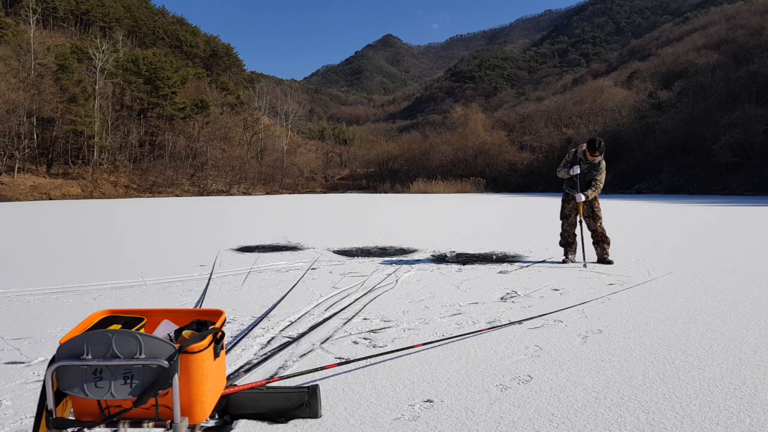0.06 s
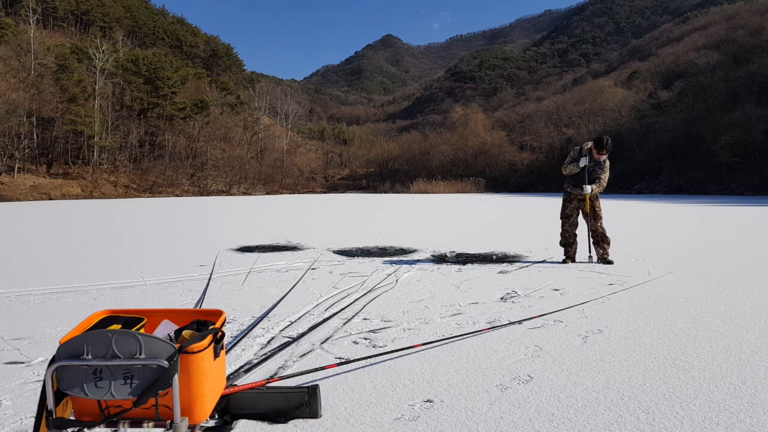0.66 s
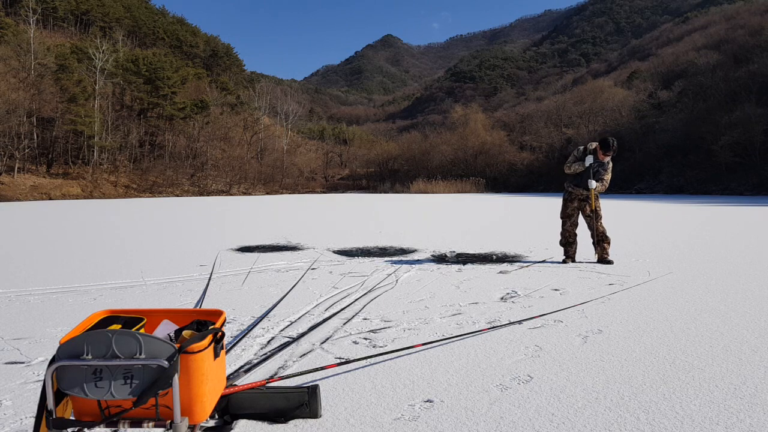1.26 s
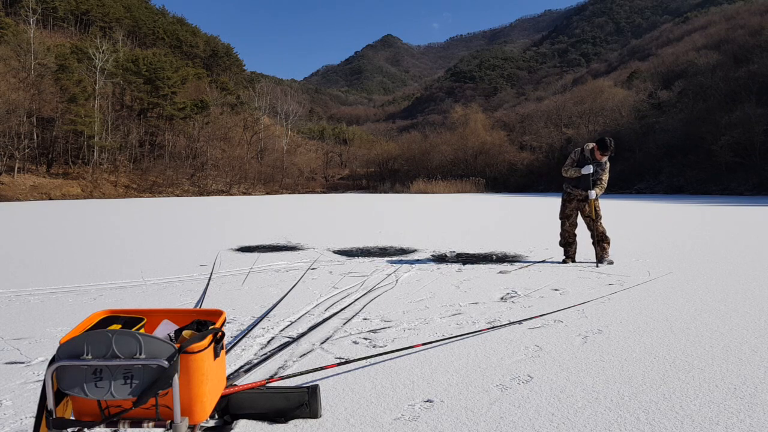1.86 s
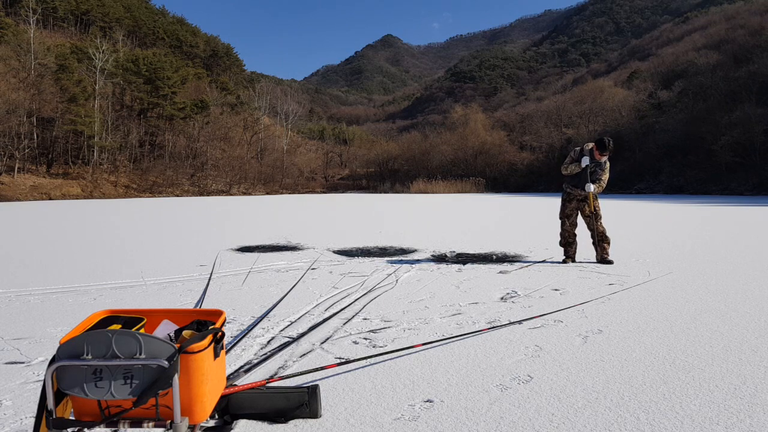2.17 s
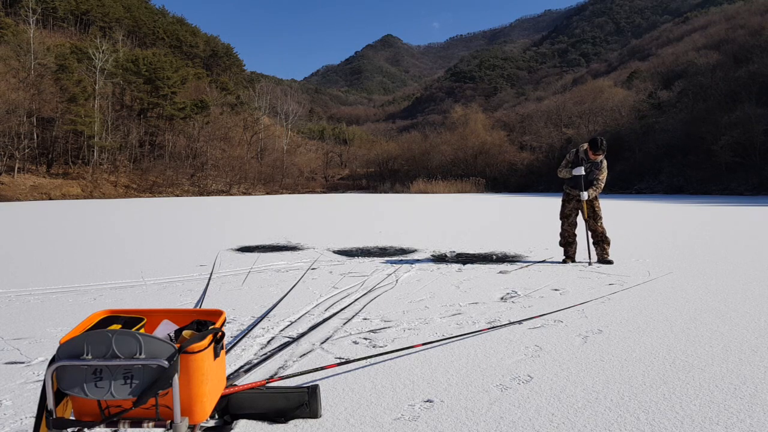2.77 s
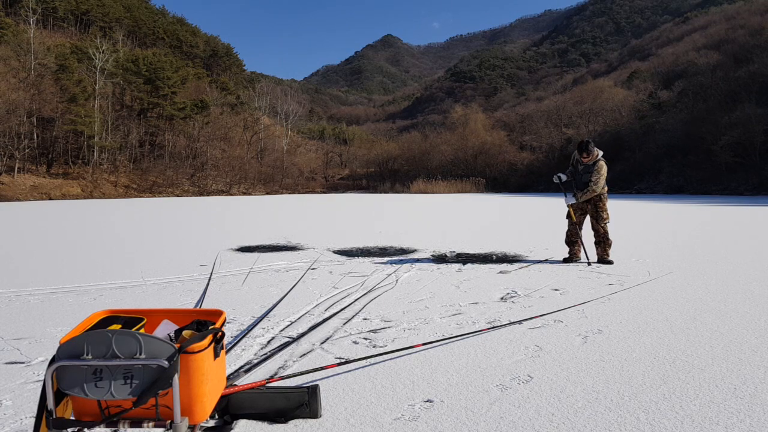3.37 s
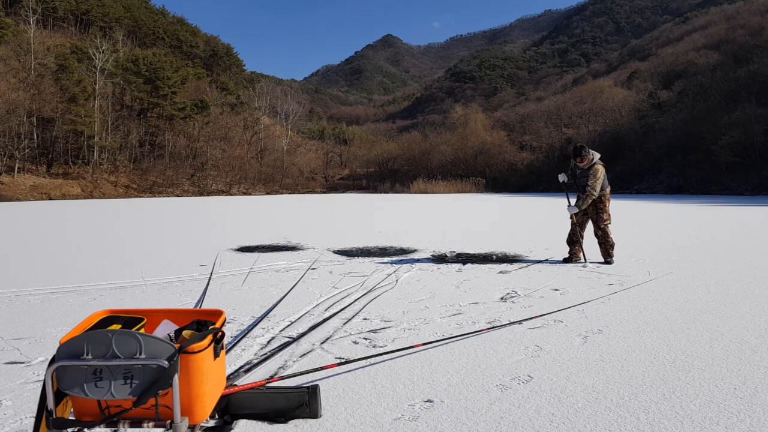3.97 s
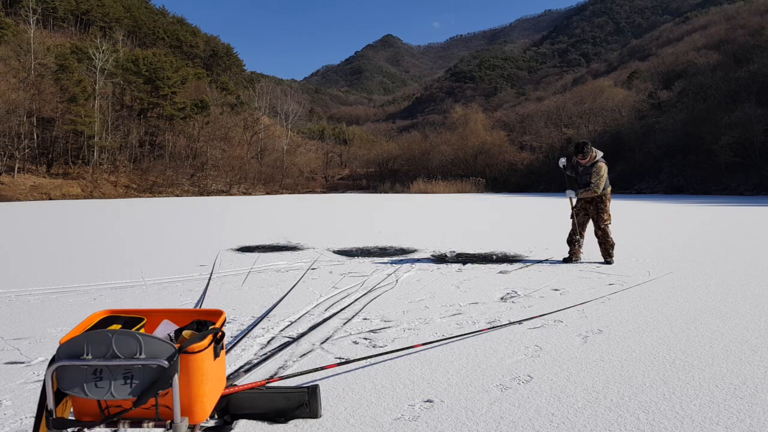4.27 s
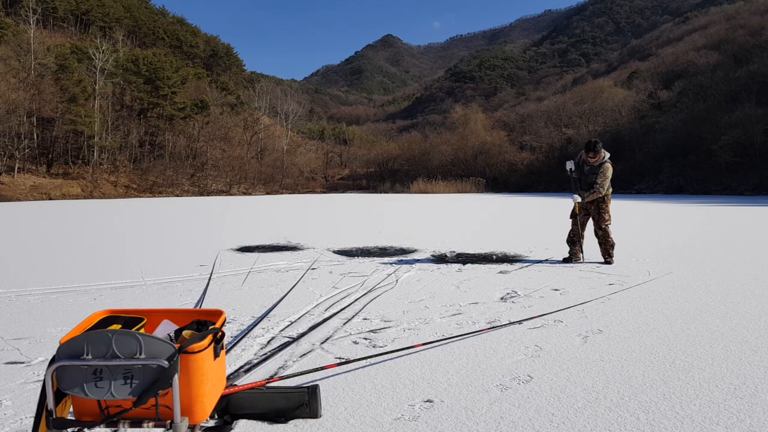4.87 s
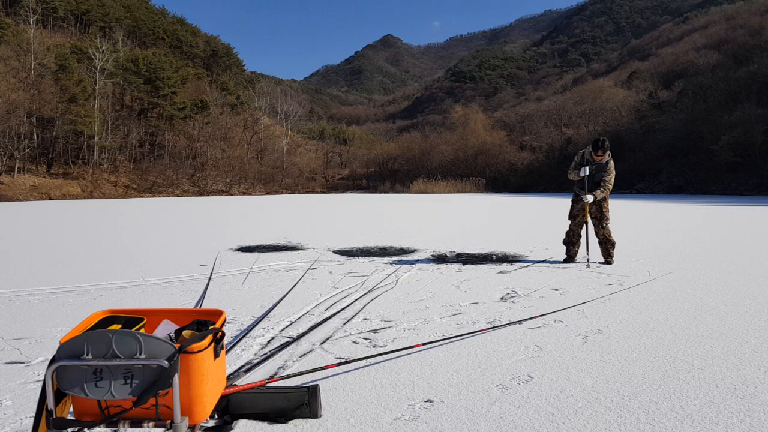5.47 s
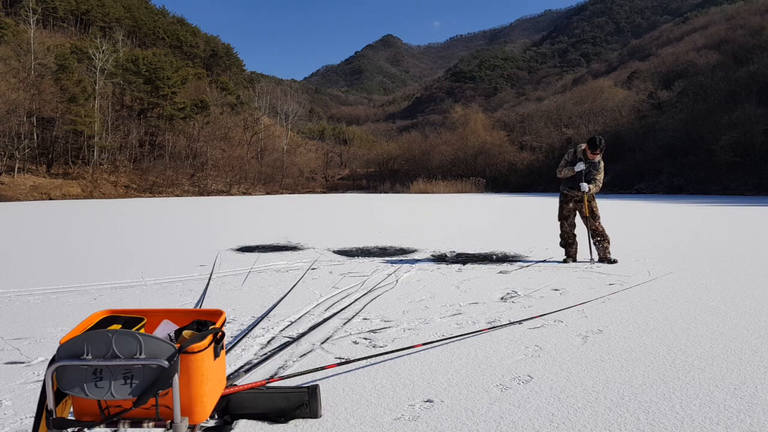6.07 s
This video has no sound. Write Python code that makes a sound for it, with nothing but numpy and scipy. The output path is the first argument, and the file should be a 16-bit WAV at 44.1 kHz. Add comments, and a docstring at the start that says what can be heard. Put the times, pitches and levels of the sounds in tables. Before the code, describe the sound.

A steel chisel chops into a frozen lake in steady ringing, crunching blows with low thumps, pausing once, over faint wind.

```python
"""Light wind and a faint hiss lie over a frozen reservoir. Almost at once a steel ice chisel, some ten
metres away, starts chopping a hole. Each blow bends the ice sheet, and the fast, high waves arrive first,
as a falling chirp and a short note. The ice crunches, the steel bar rings and the slow waves add a low
thump. Then the loose blade knocks and scrapes in the hole while the note returns from the shores as a
soft hum. After seven blows comes a short pause, then five more."""
import sys
import numpy as np
from scipy import signal
from scipy.fft import rfft, irfft, next_fast_len
from scipy.io import wavfile

SR = 44100
rng = np.random.default_rng(int(sys.argv[2]) if len(sys.argv) > 2 else 0)


def bounce(signal):
    """Save signal as a 16-bit WAV file at the path given by the first command-line argument."""
    frames = np.transpose(np.atleast_2d(signal))
    limited = np.clip(frames, -1, 1)
    pcm = np.round(limited * 32767).astype(np.int16)
    wavfile.write(sys.argv[1], SR, pcm)


N = 270333
TIME = np.arange(N) / SR


def from_db(db):
    """Turn decibels into a number to multiply by."""
    return 10 ** (np.asarray(db) / 20)


def rms_one(x):
    """Scale a sound so that its average strength (rms) is 1."""
    return x / np.sqrt(np.mean(x ** 2) + 1e-20)


def at_hz(points, hz):
    """Read between the rows of a frequency table, giving each octave equal room."""
    known_hz, values = np.transpose(points)
    return np.interp(np.log(np.maximum(hz, 1)), np.log(known_hz), values)


def add(track, s, sound):
    """Mix a sound into the track, starting at s seconds."""
    start = max(round(s * SR), 0)
    track[start:start + len(sound)] += sound[:max(N - start, 0)]


def colour(x, spectrum, size=4096):
    """Give a sound the tone in a table; white noise keeps its power."""
    gain = from_db(at_hz(spectrum, np.fft.rfftfreq(size, 1 / SR)))
    cepstrum = irfft(np.log(rms_one(gain)))
    # fold the filter so that it never answers before the sound starts
    cepstrum[1:size // 2] *= 2
    cepstrum[size // 2 + 1:] = 0
    response = irfft(np.exp(rfft(cepstrum)))
    return signal.oaconvolve(x, response)[:len(x)]


def band(x, low_hz, high_hz):
    """Soften everything outside two frequencies."""
    return signal.sosfilt(signal.butter(2, [low_hz, high_hz], "band", fs=SR, output="sos"), x)


def ring(force, hz, t60):
    """Each push starts a pure tone, which fades by 60 dB in t60 seconds."""
    decay, step = from_db(-60 / (t60 * SR)), 2 * np.pi * hz / SR
    feedback = [1, -2 * decay * np.cos(step), decay ** 2]
    return signal.lfilter([.5, 0, -.5], feedback, force + 1e-18)


def glide_phase(pitch_hz, centre):
    """The angle of a wave with sliding pitch, counted from sample number `centre`."""
    phase = 2 * np.pi * np.cumsum(pitch_hz) / SR
    return phase - phase[min(round(centre), len(phase) - 1)]


def fracture(length, rise, fade, grain_db, size=8192):
    """Ice breaks in many tiny, uneven cracks for `length` seconds; then they die away."""
    t = TIME[:size]
    envelope = np.minimum(t / rise, 1) * np.exp(-np.maximum(t - length, 0) / fade)
    noise = rng.standard_normal(size)
    crack_sizes = from_db(grain_db * np.clip(rng.standard_normal(size // 16), -2, 2)).repeat(16)
    return rms_one(noise * crack_sizes * envelope) * np.sqrt(np.mean(envelope ** 2))


# The deep tone of the wind: f/Hz, level/dB
WIND_TONE = [(12, -37), (20, -8.5), (61, -7), (101, -15), (118, -10.5), (162, -28.5), (241, -31),
             (439, -39.5), (600, -33.5), (780, -82.5), (1320, -120)]


def wind(level_db=-67.5, gust_db=5.0, count=50):
    """Light air rumbles, swelling and sinking at random."""
    gusts = np.interp(TIME, np.linspace(0, TIME[-1], count), rng.standard_normal(count))
    return from_db(level_db + gust_db * gusts) * rms_one(colour(rng.standard_normal(N), WIND_TONE))


# The tone of the hiss: f/Hz, level/dB
HISS_TONE = [(290, -52.5), (500, -12), (769, -2), (954, -9), (1180, -5.5), (1670, -9), (1900, -8.5),
             (4770, -7.5), (5590, -4.5), (7780, -3.5), (15500, -8.5)]
# How alike its left and right sides are: f/Hz, likeness (1 = the same)
HISS_ALIKE = [(500, 0.83), (2000, 0.51), (5000, 0.11), (9000, 0.21), (14000, .05)]


def hiss(level_db=-76):
    """Steady microphone hiss; its high part spreads wider between left and right."""
    size = next_fast_len(N, real=True)
    hz = np.fft.rfftfreq(size, 1 / SR)
    alike = np.clip(at_hz(HISS_ALIKE, hz), 0, 1)
    mid, side = rfft(rng.standard_normal((2, size))) * from_db(at_hz(HISS_TONE, hz))
    both = np.sqrt(1 + alike) * mid + np.sqrt(1 - alike) * side * np.array([[1], [-1]])
    return from_db(level_db) * rms_one(irfft(both, size)[:, :N])


# The chisel blows; each function adds its own offset to these levels: t/s, crushing time/s, crunch/dB,
# treble boost/dB, ring of the stuck bar/Hz, ice note delay/s, ice note f/Hz, ice note/dB, thump/dB
CHOPS = [(0.158, 0.014, -41, 7, 4074, .007, 457, -45.5, -38),
         (0.622, 0.011, -39.5, 5.5, 1880, .014, 376, -38, -35.5),
         (1.054, 0.0077, -39, 2.5, 2820, 0.011, 396, -35, -38),
         (1.512, 0.014, -42, -3.5, 1437, 0.0062, 398, -33.5, -30),
         (1.939, .0055, -38, 3.5, 2385, 0.0027, 422.6, -45.5, -39),
         (2.393, 0.0078, -41.5, 8, 4390, 0.0099, 414, -41, -34.5),
         (2.836, 0.013, -38.5, 0, 2134, 0.0066, 390.4, -39.5, -34.5),
         (4.125, 0.01, -35, -19, 1338, .010, 404.4, -35, -37),
         (4.618, 0.013, -42, -1.5, 1870, 0.00998, 436.3, -41.5, -36),
         (5.083, 0.017, -39.5, 1.5, 4000, 0.0095, 420.8, -23, -30),
         (5.538, 0.016, -41.5, -12, 940, .007, 426, -36.5, -36.5),
         (6.013, 0.024, -38.5, -0.5, 1795, 0.014, 466.5, -35, -33)]
# The tone of the earliest waves, dulled by the ice: f/Hz, level/dB
FORERUNNER_TONE = [(200, -8), (400, 14), (650, 9.5), (1000, -0.5), (1500, -3), (2600, -14.5), (4700, -18.5),
                   (6500, -22.5), (10000, -34), (16000, -48)]


def forerunners(lead_s=.016, level_db=-6):
    """Short waves in the ice outrun sound in air and arrive just before each crunch."""
    force = np.zeros(N)
    for s, _, db, *_ in CHOPS:
        cracks = fracture(lead_s, rise=0.0059, fade=0.001, grain_db=2.0)
        add(force, s - lead_s, from_db(db + level_db) * cracks)
    return colour(force, FORERUNNER_TONE)


# How loud the chirp is at each pitch on its way down: f/Hz, level/dB
CHIRP_TONE = [(70, -36), (120, -12), (195, -22), (290, -12.5), (400, -5.5), (600, 9.5), (800, 3),
              (1300, -8), (3000, -42.5)]


def chirps(travel_s=0.023, level_db=-9, size=4096):
    """A wave four times as high crosses the ice twice as fast, so each blow becomes a falling chirp."""
    out, flight = np.zeros(N), TIME[1:size]
    fade = signal.windows.tukey(len(flight), .2)
    for s, *_, lag, hz, db, _ in CHOPS:
        pitch = np.minimum(hz * (travel_s / flight) ** 2, SR / 4)
        chirp = fade * from_db(at_hz(CHIRP_TONE, pitch)) * np.sin(glide_phase(pitch, travel_s * SR))
        add(out, s + lag - travel_s, from_db(db + level_db) * chirp)
    return out


# The tone with which the ice answers every touch: f/Hz, level/dB
ICE_TONE = [(190, -26), (280, -9), (345, -9.5), (405, -5), (470, -11.5), (540, -11.5), (640, -22.5),
            (1200, -31), (4000, -68)]


def ice_note(width_s=0.0048, glide_s=0.071, lead_s=.023, late_fade_s=0.04,
             early_db=-22, rough_db=-17, late_db=-19, level_db=10.0, size=8192):
    """Waves as fast as sound pass best into the air: a brief sinking note, rough with scattered waves."""
    out, age = np.zeros(N), TIME[:size]
    t = age - lead_s  # zero at the peak of the note
    swell = np.exp(-np.abs(t / width_s) ** 3 / 2)
    early = from_db(early_db) * np.sin(np.pi * np.minimum(age / lead_s, 1)) ** 2
    late = from_db(late_db) * np.clip(t / width_s, 0, 1) * np.exp(-np.abs(t) / late_fade_s)
    for s, *_, lag, hz, db, _ in CHOPS:
        pitch = hz * np.exp(-np.clip(t, -2 * width_s, 2 * width_s) / glide_s)
        note = (swell + early) * np.sin(glide_phase(pitch, lead_s * SR))
        noise = rms_one(colour(rng.standard_normal(size), ICE_TONE))
        scattered = (from_db(rough_db) * swell + late) * noise
        add(out, s + lag - lead_s, from_db(db + level_db) * (note + scattered))
    return out


# The tone of breaking ice: f/Hz, level/dB
CRUNCH_TONE = [(200, -2.5), (500, 15), (720, 2.5), (1100, 2.5), (1500, 0.5), (2700, 0.5), (4700, -3),
               (6000, -16), (7700, -13.5), (10000, -22), (12500, -44.5), (16000, -48.5)]


def crunches(level_db=2, crumbs_db=-24, bar_db=-45, stuck_db=-30, bright_hz=5500):
    """The edge crushes ice, crumbs fly after it, and the bar rings."""
    force, stuck = np.zeros((2, N))
    treble = signal.butter(1, bright_hz, "high", fs=SR)
    for s, length, db, bright_db, ring_hz, *_ in CHOPS:
        crush = fracture(length * 0.98, rise=0.0025, fade=0.0059, grain_db=3.5)
        crumbs = from_db(crumbs_db) * fracture(length, rise=0.014, fade=0.044, grain_db=5.5)
        bite = from_db(db + level_db) * (crush + crumbs)
        add(force, s - .001, bite + (from_db(bright_db) - 1) * signal.lfilter(*treble, bite))
        # stuck in the cut, the bar rings briefly at a pitch set by how it is gripped
        add(stuck, s, from_db(stuck_db) * ring(bite, ring_hz, t60=.05))
    return colour(force, CRUNCH_TONE) + from_db(bar_db) * bar(force, damping=1.1) + stuck


# The steel bar's own notes: f/Hz, level/dB, ring time at a damping of 1/s
BAR_NOTES = [(663.5, -5.5, 0.18), (988, 1, 0.16), (1120, -16.5, 0.21), (1298, 0.5, 0.094),
             (1436, -4.5, 0.14), (1530, -7.5, 0.26), (1798, -3, 0.097), (1967, -7, 0.16),
             (2080, -3.5, 0.052), (2230, -4.5, 0.14), (2585, -1, 0.11), (2986, -4.5, 0.055),
             (3110, -9.5, 0.13), (3410, -4.5, 0.042), (3570, -4.5, .085), (4050, -12.5, 0.17),
             (4760, -6.5, .06), (7700, -19, .05)]


def bar(force, damping=0.96):
    """The bar bends to and fro and rings; a larger `damping` gives a shorter ring."""
    return sum((-1) ** k * from_db(db) * ring(force, hz, t60 / damping)
               for k, (hz, db, t60) in enumerate(BAR_NOTES))


# The tone of what comes back from the shores: f/Hz, level/dB
SHORE_TONE = [(150, -34), (280, -20), (345, -1), (430, 0), (520, -4), (630, -19), (1100, -28), (1600, -44),
              (5000, -70)]


def shore_echoes(arrival_s=0.14, t60=0.88, level_db=-24, wash_db=-2, hum_db=1,
                 hum_width_hz=16, start_ratio=0.9, rise_hz_per_s=110):
    """The ice note returns from all round the shore: a fading hum that rises in pitch, in soft noise."""
    out, age = np.zeros(N), TIME[:SR]
    envelope = np.minimum(age / arrival_s, 1) * from_db(-60 * np.maximum(age - arrival_s, 0) / t60)
    narrow = signal.butter(2, hum_width_hz, fs=SR, output="sos")
    for s, *_, hz, db, _ in CHOPS:
        wash = rms_one(envelope * colour(rng.standard_normal(SR), SHORE_TONE))
        waver = signal.sosfilt(narrow, rng.standard_normal((2, SR)))
        phase = glide_phase(start_ratio * hz + rise_hz_per_s * age, 0)
        hum = rms_one(envelope * (waver[0] * np.cos(phase) + waver[1] * np.sin(phase)))
        echo = from_db(wash_db) * wash + from_db(hum_db) * hum
        add(out, s, from_db(db + level_db) * envelope.std() * echo)
    return out


def sheet_rumble(level_db=-25, t60=1.5, low_hz=35, high_hz=130):
    """Long waves keep wandering through the ice after each blow, and fade slowly."""
    power = np.zeros(N)
    for s, *_, db in CHOPS:
        add(power, s, from_db(db + level_db - 60 * TIME / t60) ** 2)
    return np.sqrt(power) * rms_one(band(rng.standard_normal(N), low_hz, high_hz))


# The deep notes of the floating ice sheet: f/Hz, level/dB, ring time/s
THUMP_NOTES = [(48.1, -3, 0.23), (79.1, -8, 0.31), (116.9, -4, 0.14), (146, -7, 0.12)]


def thumps(level_db=6.5, delay_s=0.0027, spread_s=0.014, slow_hz=80, top_hz=170,
           detune=0.054, uneven_db=3.0):
    """Long waves travel slowest, so the low heave of the ice swells up after the crunch."""
    out, t = np.zeros(N), TIME[:SR // 2]
    for s, *_, db in CHOPS:
        chance = rng.standard_normal((len(THUMP_NOTES), 2))
        for (hz, note_db, t60), (off_pitch, strength) in zip(THUMP_NOTES, chance):
            wave = np.sin(2 * np.pi * hz * (1 + detune * off_pitch) * t) * from_db(-60 * t / t60)
            swell = 1 - np.exp(-(t * hz / slow_hz / spread_s) ** 2)
            gain = from_db(db + note_db + level_db + uneven_db * strength)
            add(out, s + delay_s * (slow_hz / hz) ** 2, gain * swell * wave)
    return signal.sosfilt(signal.butter(2, top_hz, fs=SR, output="sos"), out)


def rattles(count=4, after_s=.028, gap_s=0.019, uneven=.25, touch_s=0.004,
            first_db=-17, loss_db=10, ice_db=13.5, clink_hz=1906, octaves=.3):
    """The loose blade rattles after each blow, ever more weakly. Gives rows like BLADE_TOUCHES."""
    rows = []
    for s, _, db, *_ in CHOPS:
        for k, (slip, tone) in enumerate(rng.uniform(-1, 1, (count, 2))):
            start = s + after_s + gap_s * (k + uneven * slip)
            touch_db = db + first_db - loss_db * k
            rows.append((start, touch_s, touch_db, clink_hz * 2 ** (octaves * tone), touch_db + ice_db))
    return rows


# The clearest cracks, bounces and scrapes in the hole: t/s, length/s, level/dB, clink f/Hz, ice note/dB
BLADE_TOUCHES = [(0.2, 0.017, -55, 2090, -43.5), (0.461, 0.0021, -68.5, 2300, -86),
                 (1.093, 0.0013, -42.5, 2700, -36), (1.117, 0.0023, -54, 2700, -44.5),
                 (1.598, .0033, -66.5, 1300, -75), (1.982, 0.0028, -62, 1800, -38),
                 (1.996, .012, -47.5, 2500, -53), (2.428, 0.0075, -57, 2200, -44.5),
                 (2.454, 0.0025, -53.5, 1680, -50.5), (2.467, 0.0047, -52.5, 2300, -57),
                 (2.486, 0.0043, -56, 3900, -62), (2.876, 0.0074, -47, 1860, -65),
                 (2.897, 0.019, -54, 1800, -40), (4.151, 0.012, -50.5, 1420, -40.5),
                 (4.219, 0.004, -56, 2030, -67), (4.661, 0.0032, -54, 2110, -46.5),
                 (5.082, 0.00071, -26.5, 4430, -43), (5.119, 0.0017, -44, 1650, -51),
                 (5.134, 0.0039, -43, 2080, -67), (5.157, .0021, -33, 2926, -78),
                 (5.189, 0.0011, -43.5, 1990, -62), (5.577, 0.015, -42, 2200, -37),
                 (5.599, 0.012, -34.5, 2500, -39), (5.626, 0.0081, -39, 3000, -46),
                 (5.654, .0074, -45.5, 3040, -49.5), (6.105, 0.0056, -51, 1750, -79)]
# The tone of the scraping blade: f/Hz, level/dB
SCRAPE_TONE = [(200, -3.5), (450, -2.5), (800, 1), (1500, 7), (3200, -3.5), (4900, -5.5), (6000, -21.5),
               (8000, -25), (11000, -40), (16000, -54)]


def knocks(scrape_db=-6, clink_db=-5, clink_ratio=1.18, clink_t60=0.032,
           bar_db=-39, note_db=-3, top_hz=7000):
    """The blade touches the wall of the hole: a scrape, a clink, a ring of steel and a dull knock."""
    force, clinks, sheet = np.zeros((3, N))
    for s, length, db, hz, ice_db in BLADE_TOUCHES + rattles():
        touch = from_db(db) * fracture(length, rise=0.00083, fade=0.0036, grain_db=-1.5)
        push = from_db(ice_db) * fracture(0.0073, rise=0.00021, fade=0.0012, grain_db=2.5)
        # a chip of ice rings briefly at three close pitches
        chip = sum(rms_one(ring(touch, hz * clink_ratio ** k, clink_t60)) for k in (-1, 0, 1))
        add(force, s, touch)
        add(clinks, s, touch.std() * rms_one(chip))
        add(sheet, s, push.std() * rms_one(colour(push, ICE_TONE)))
    scrapes = from_db(scrape_db) * colour(force, SCRAPE_TONE)
    contact = scrapes + from_db(clink_db) * clinks + from_db(bar_db) * bar(force)
    soften = signal.butter(2, top_hz, fs=SR, output="sos")  # a light touch carries little treble
    return signal.sosfilt(soften, contact) + from_db(note_db) * sheet


# Faint dull ticks, and the first sharp echoes of the loudest blow: t/s, length/s, level/dB
TICKS_AND_ECHOES = [(0.894, .03, -61.5), (3.01, .001, -52), (5.287, 0.0012, -50), (5.319, 0.0012, -55)]


def ticks_and_echoes(level_db=2):
    """Short, dull bursts of noise: two faint ticks, then two sharp echoes of the loudest blow."""
    force = np.zeros(N)
    for s, length, db in TICKS_AND_ECHOES:
        add(force, s, from_db(db + level_db) * fracture(length, rise=0.00053, fade=0.0016, grain_db=5.0))
    return band(force, low_hz=342, high_hz=1060)


def scene():
    """The chopping is heard from straight ahead, in open air."""
    chopping = forerunners() + crunches() + knocks() + ice_note() + chirps() + thumps()
    return chopping + shore_echoes() + sheet_rumble() + ticks_and_echoes() + wind() + hiss()


def record(dry):
    """The very highest sounds, above 15700 Hz, are cut away."""
    return signal.sosfilt(signal.ellip(12, .1, 70, 15700, fs=SR, output="sos"), dry)


dry = scene()
out = record(dry)
bounce(out)
```